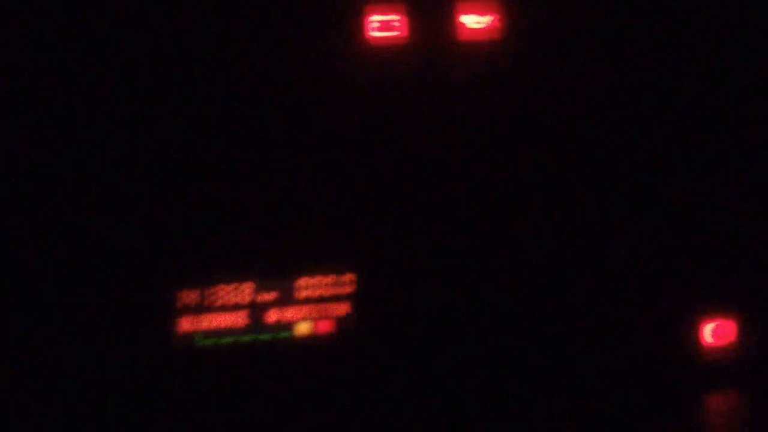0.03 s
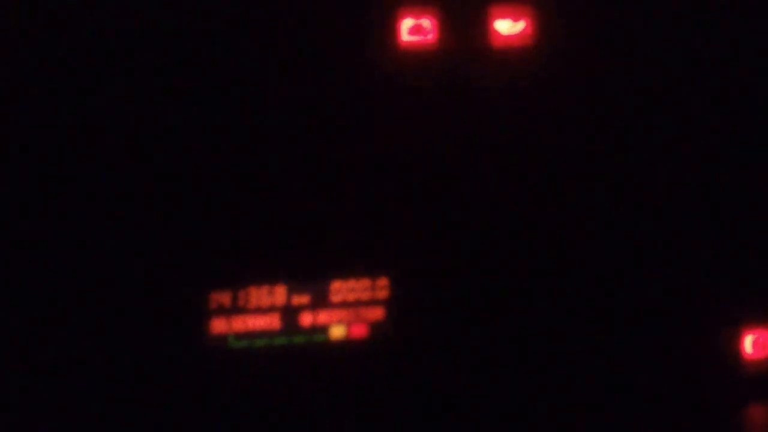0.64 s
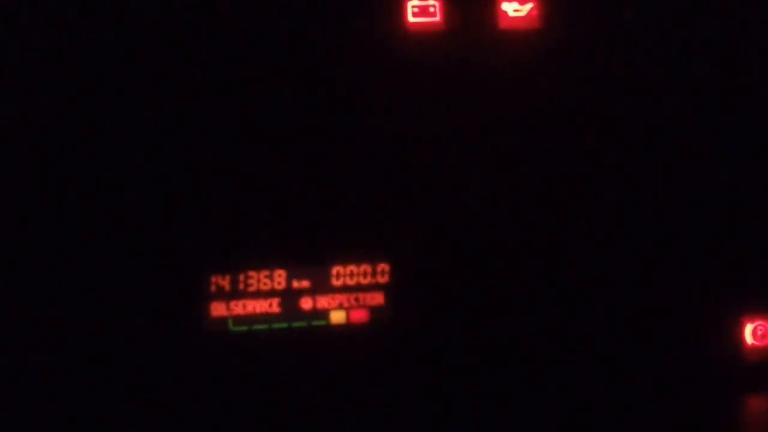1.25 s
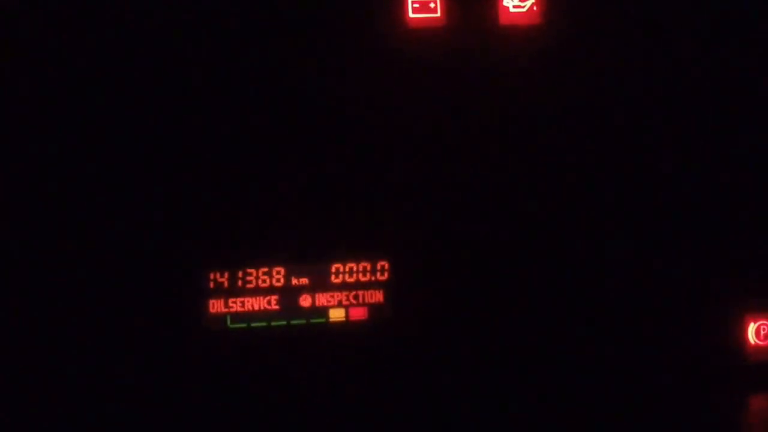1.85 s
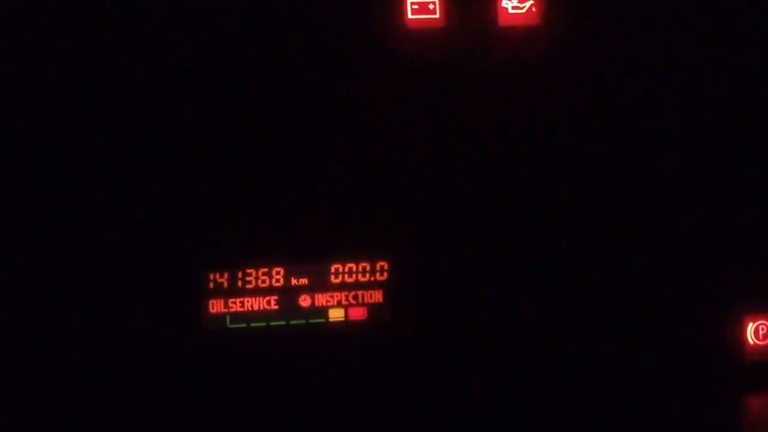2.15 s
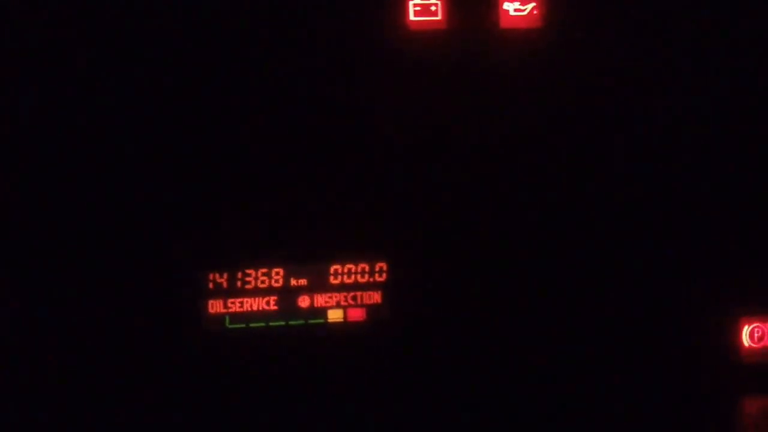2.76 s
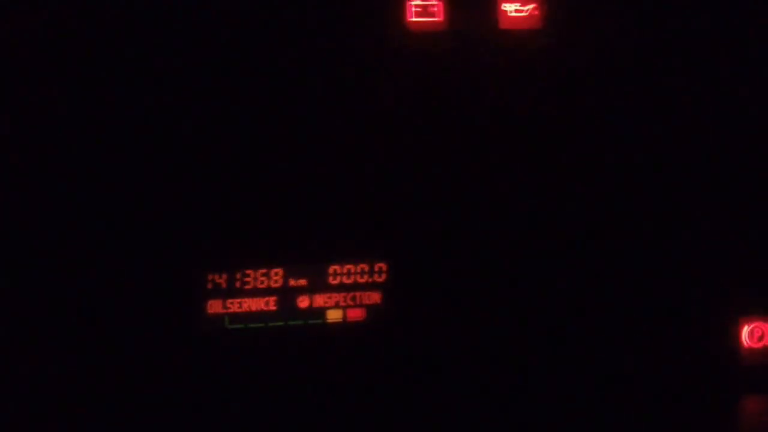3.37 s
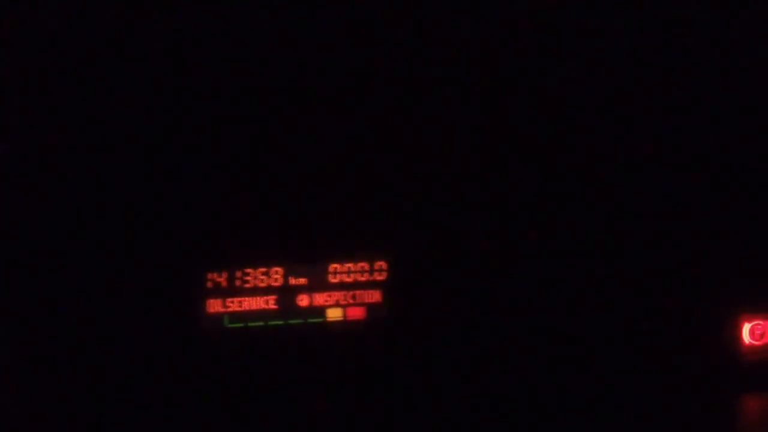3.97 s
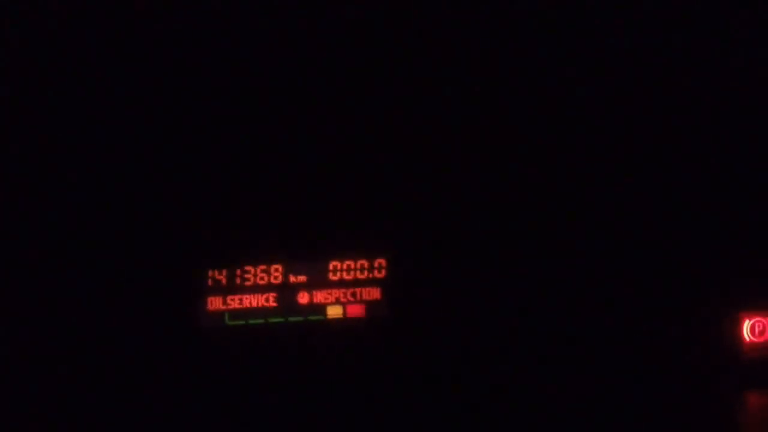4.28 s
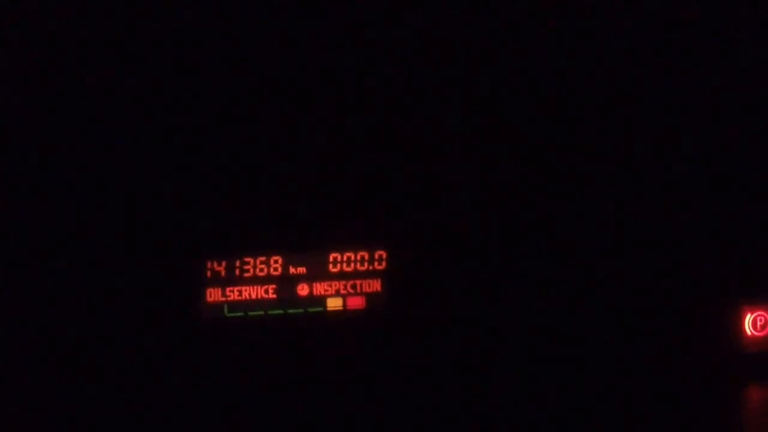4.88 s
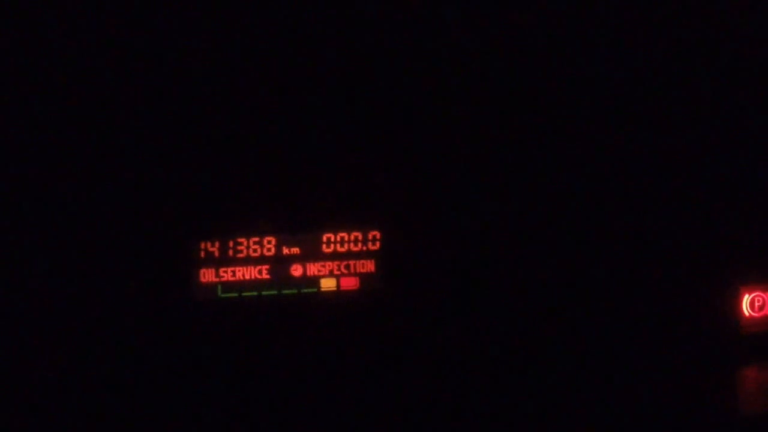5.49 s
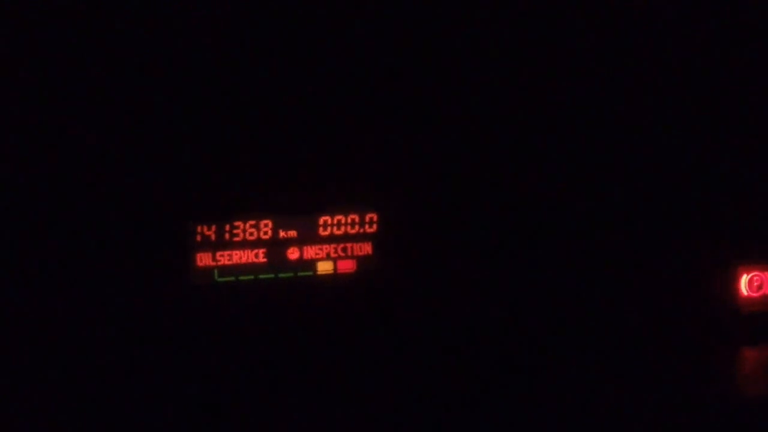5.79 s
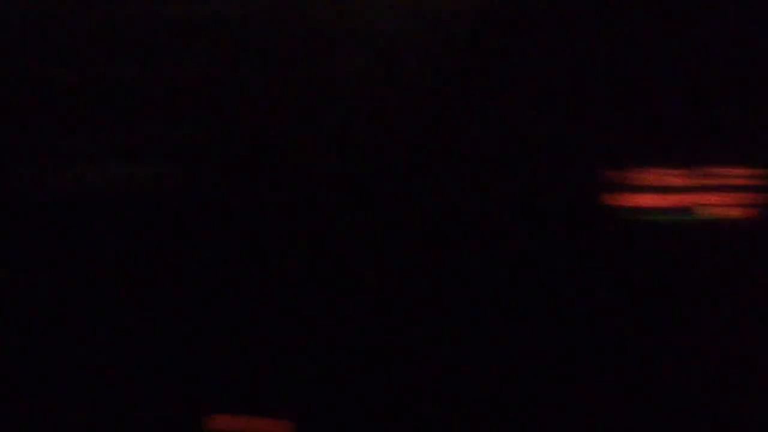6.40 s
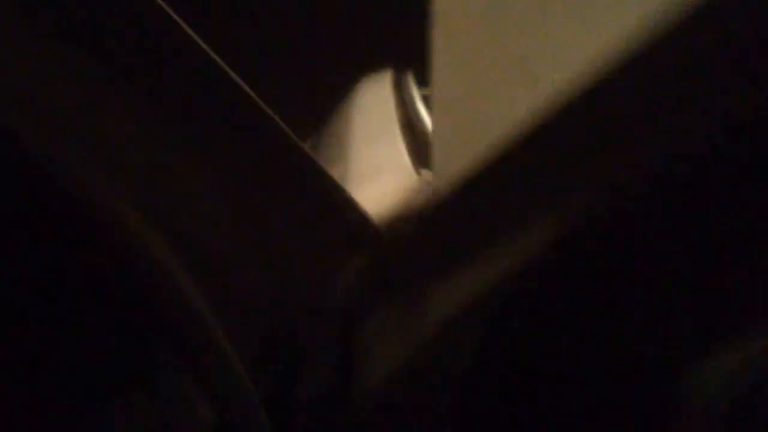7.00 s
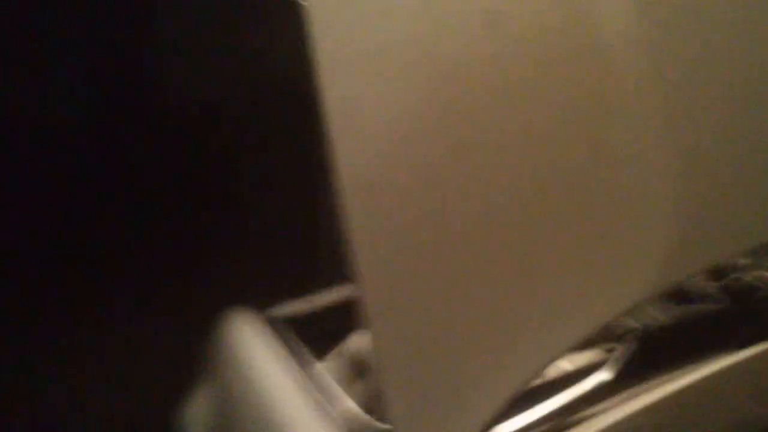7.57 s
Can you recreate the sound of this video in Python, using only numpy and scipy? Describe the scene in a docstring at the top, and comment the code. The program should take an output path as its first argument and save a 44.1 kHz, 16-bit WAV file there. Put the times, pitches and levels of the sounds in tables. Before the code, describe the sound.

Inside a car, keys tick, the starter cranks briefly, and the engine catches, flares and settles into a deep, booming idle.

```python
"""Inside a parked car at night, microphone at the driver's seat. At arm's length a sleeve rustles, keys tick,
the starter relay clicks and the starter whines briefly. Up front the six-cylinder engine catches with a shudder
and a thump, flares, and sinks to a fast idle that booms in the cabin. The fan hiss swells as the microphone
swings in close to the dashboard, where the plastic trim rattles."""
import sys
import numpy as np
from scipy import signal
from scipy.fft import rfft, irfft, next_fast_len
from scipy.io import wavfile
from scipy.ndimage import map_coordinates

SR = 44100
rng = np.random.default_rng(int(sys.argv[2]) if len(sys.argv) > 2 else 0)


def output_pcm(signal):
    """Save a mono or channel-first signal as 16-bit PCM at the path in sys.argv[1].

    Samples are clipped to [-1, 1] before scaling.
    """
    pcm = np.clip(np.atleast_2d(signal).T, -1, 1) * 32767
    wavfile.write(sys.argv[1], SR, np.round(pcm).astype(np.int16))


N = 341334

# The starter bites, the first cylinders fire, the shudder peaks, the engine runs by itself.
CRANK_S, CATCH_S, SHUDDER_S, RUN_S = 2.873, 3.44, 3.472, 3.55
CRANK_HZ, CATCH_HZ, IDLE_HZ, HIGH_HZ = 47.97, 42.06, 65.8, 77  # firings a second
DIP_S, DIP_END_S = 3.552, 3.578  # the level dips briefly after the thump
SWING_S = 6.17  # the microphone starts towards the dashboard


def engine():
    """Firings boom as a deep tone with overtones; unequal cylinders throb and body panels drone."""
    # Through the flare, then the sinking idle. Each row: time in seconds, firings a second.
    flare_speed = [(3.62, 81.7), (3.796, 84.8), (4.006, 78.7), (4.25, 67.2)]
    idle_speed = [(4.55, 65.3), (4.93, 65.3), (5.11, 63.1), (5.81, 60.4), (6.12, 59.9), (6.18, 58.9),
                  (7.3, 54.6), (7.69, 54.4)]
    # How the cabin booms at the seat. Each row: pitch in Hz, level in dB.
    cabin_boom = [(42, -22.5), (54, -19), (61, -18.4), (66, -24.5), (81, -30.5), (111, -41.5), (122, -45),
                  (135, -38.5), (157, -33), (168, -39.5)]
    # Upper engine orders. Each row: multiple of the firing rate, relative level in dB.
    upper_orders = [(2.5, 1.5), (3, .5), (4, -2.5), (5, -9), (6, 0), (7, -15), (8, -7.5), (9, -21)]
    # Orders of the unequal cylinders. Each row: multiple of the six-firing cycle, relative level in dB.
    uneven_orders = [(2, -9), (3, -3), (4, -29.5), (5, -1.5), (7, -54), (11, -14), (13, -15.5), (17, -16),
                     (19, -21), (22, -21), (29, -25)]
    # Panel resonances. Each row: frequency in Hz, half width in Hz, relative level in dB.
    panels = [(360, 28, -1), (485, 46, 3.5), (657, 29, -6), (958, 56, -6.5), (1370, 140, -8),
              (1750, 190, -14.5)]
    crank_speed = [(CRANK_S, CRANK_HZ), (CATCH_S - .14, CRANK_HZ), (CATCH_S, CATCH_HZ)]
    hz = curve(crank_speed + list(flare_speed) + list(idle_speed))
    firings = np.cumsum(hz * (1 + .002 * wobble(14))) / SR
    revs = np.clip((hz - IDLE_HZ) / (HIGH_HZ - IDLE_HZ), 0, 1)
    swing = ramp(SWING_S, .63)
    node = swell(6.65, .33)  # the microphone crosses a quiet spot of the boom
    close = ramp(SWING_S + .3, 1.0)  # and ends right at the dashboard
    # The engine rocks on the starter; each compression checks it.
    rocking = ramp(2.904, .23) * (1 - ramp(CATCH_S - .09, .045)) * amp(-10.5 - 14 * compression())
    shudder = amp(8.3) * envelope(SHUDDER_S, RUN_S, attack=.21, release=.031)
    force = rocking + shudder + ramp(RUN_S, .02)
    boom_db = along(cabin_boom, hz) - 5 * node
    octave_db = along(cabin_boom, np.maximum(2 * hz, 108)) + 1.8 * wobble(9)
    boom = amp(boom_db) * tone(firings)
    octave = amp(octave_db) * tone(2 * firings)
    frayed = firings + .006 * wobble(30)  # each firing comes slightly early or late
    body_db = -50 + 1.28 * (boom_db - along(cabin_boom, 60)) - 6 * close - 3 * revs
    dash_gain = close * amp(-54.5)  # the orders arrive through the body and from the dashboard
    overtones = sum((amp(body_db + db) + dash_gain) * amp(2.17 * wobble(7)) * tone(k * frayed)
                    for k, db in upper_orders)
    throb_db = -38 + 3 * revs - 13 * ramp(6.75, .59)
    throb = sum(amp(throb_db + db + 2 * wobble(6)) * tone(k * firings / 6) for k, db in uneven_orders)
    # No two burns are alike, which leaves a rumble between the orders until the idle settles.
    rumble_db = -37.5 - 12 * ramp(4.3, 1.4) + 7 * node
    rumble_spectrum = [(15, -7.5), (35, 5.5), (55, 7), (90, -6.5), (170, -10), (300, -28), (900, -83)]
    rumble = amp(rumble_db) * noise(rumble_spectrum)
    drone = amp(-63 + 16 * revs + 16 * swing) * resonant(panels)
    # The shudder is mostly the deep tone: the rest grows only a little with it.
    rest = np.minimum(force, 1.7) * (octave + overtones + throb + rumble + drone)
    return force * boom + rest + machinery(firings, revs, swing)


def machinery(firings, revs, swing):
    """Valves and gears clatter in time with the shaft; intake and fan air hiss evenly."""
    # Idle clatter, cranking grind and air hiss. Each row: frequency in Hz, spectral level in dB.
    clatter_spectrum = [(25, 14), (60, 7), (130, 3), (250, -1.5), (480, -2.5), (680, -6.5), (950, -6),
                        (1150, -9.5), (1450, -4.5), (1950, -9), (2600, -8.5), (3600, -20.5), (5000, -12.5),
                        (8000, -45.5), (11000, -94)]
    grind_spectrum = [(59, -42.5), (100, -1), (152, -6.5), (241, -0.5), (281, -2), (447, -13), (590, -7),
                      (855, -9), (1580, -9.5), (1970, -16.5), (2480, -10), (3120, -16), (4000, -19.5),
                      (5200, -46), (8800, -120)]
    hiss_spectrum = [(1000, -10), (3600, -6), (4300, -5), (4700, -3), (5600, 0.5), (6500, 1.5), (7200, -7),
                     (7800, -13.5), (8800, -24.5), (10000, -56), (11000, -68)]
    # The valve gear sings. Each row: frequency in Hz, half width in Hz, relative level in dB.
    valves = [(1417, 130, -0.5), (4570, 140, -4.5)]
    # Fan hiss at the microphone. Each row: time in seconds, relative level in dB.
    fan_levels = [(4.3, -47), (5.25, -49.5), (6.23, -48), (6.95, -40), (7.65, -38)]
    turning = envelope(CRANK_S, N / SR, attack=.045, release=1)
    running, load = ramp(CATCH_S, .15), compression()
    pulse = unit(np.exp(.12 * tone(firings / 2) + .08 * tone(firings) + .09 * tone(2 * firings)))
    idle_db = -44.5 + 4 * revs + 2.5 * swing
    idle = amp(idle_db) * (noise(clatter_spectrum) + amp(-14.5) * resonant(valves))
    grind = amp(-42.3 + 3.3 * load + 5 * ramp(3.29, .17)) * noise(grind_spectrum)
    gears = np.sqrt(running) * idle + np.sqrt(1 - running) * grind
    clatter = reflected(pulse * gears, wet_db=-7, t60=.086)
    throttle = swell(3.736, .2)  # opens briefly after the catch
    running_db = curve(fan_levels) + 1.28 + 5 * throttle
    cranking_db = -42 + 2 * load + 3.8 * ramp(3.01, .53)
    hiss_db = running * running_db + (1 - running) * cranking_db
    hiss = amp(hiss_db + .46 * wobble(15)) * reflected(noise(hiss_spectrum), wet_db=-12, t60=.11)
    return turning * (amp(.41 * wobble(12)) * clatter + hiss)


def thump():
    """The first strong burns jolt the body of the car: a low ring and a short rattle."""
    # Modes of the car body. Each row: frequency in Hz, level in dB, seconds to fall 60 dB.
    body_modes = [(104.3, -8, 0.16), (225, -28, .1), (319, -20, 0.086), (463, -13, .1)]
    # The rattle. Each row: frequency in Hz, spectral level in dB.
    rattle_spectrum = [(30, -11), (70, -9), (150, 3), (250, -3.5), (380, -14), (480, -3), (620, -19),
                       (1000, -17.5), (3500, -28), (6000, -20), (7200, -27), (8200, -43), (15500, -51)]
    ring = struck(np.maximum(clock() - 3.537, 0), body_modes)
    rattle = amp(-12.5) * envelope(3.539, DIP_S, attack=.031, release=.053) * noise(rattle_spectrum)
    return ring + rattle


def starter():
    """The pinion's whine sags on compressions and climbs as the engine frees; its housing rings."""
    # The pinion's whine. Each row: time in seconds, gear mesh rate in Hz.
    mesh_rates = [(2.86, 190), (2.915, 231.8), (2.985, 202.8), (3.055, 302.3), (3.16, 278.2),
                  (3.225, 325.4), (3.325, 352.3), (3.5, 340)]
    # How the engine mounts pass the whine on. Each row: frequency in Hz, level in dB.
    mounts = [(203, -35), (240, -46), (285, -33), (325, -38), (350, -46.5), (450, -50), (600, -38.5),
              (650, -48.5), (704, -35.5)]
    # Housing resonances. Each row: frequency in Hz, half width in Hz, relative level in dB.
    housing = [(516, 21, -4), (707, 7.4, -7), (937, 37, -1.5), (1026, 15, 3.5), (1223, 22, -3.5),
               (1330, 31, 1), (1556, 35, 1), (2210, 11, -2), (2530, 50, -15), (2640, 16, -0.5),
               (3490, 21, -6), (6100, 110, -14)]
    hz, load = curve(mesh_rates), compression()
    engaged = ramp(CRANK_S, .11) * (1 - ramp(CATCH_S - .03, .08))
    teeth = np.cumsum(hz * (1 + .011 * wobble(70))) / SR
    whine = sum(amp(along(mounts, k * hz) + 13 * (load - 1)) * tone(k * teeth) for k in (1, 2))
    load_db = -46 + 5.1 * load
    upper = sum(amp(load_db - 9.5 - 1.65 * k + 7.6 * wobble(18)) * tone(k * teeth) for k in range(3, 7))
    return engaged * (whine + upper + amp(load_db - 2) * resonant(housing))


def compression():
    """How hard the pistons push back on the starter, 0 to about 1."""
    # Compression strokes. Each row: peak time in seconds, half length in seconds, strength.
    strokes = [(2.957, 0.053, .6), (3.111, .055, 0.79), (3.231, .026, 1.08), (3.336, 0.026, 0.8)]
    return sum(strength * swell(s, width) for s, width, strength in strokes)


def plastic_snaps():
    """The starter relay clicks in and out, and later the trim: each snap cracks and briefly rings the hard
    plastic."""
    # Each row: start in seconds, relative level in dB, pitch factor.
    snaps = [(2.8282, -11.5, 1), (2.8291, -10, .98), (2.8294, -36.5, 1.2), (2.8382, -25, 1.05),
             (3.4363, -8, .97), (3.4389, -26.5, 1), (7.319, -16.5, 1.2), (7.327, -20.5, 1.4),
             (7.335, -21, 1.4), (7.337, -14.5, 1.25), (7.346, -18, .75)]
    # Each row: frequency in Hz, relative level in dB, seconds to fall 60 dB.
    plastic_modes = [(2380, -25, 0.033), (4630, -21, 0.017), (5070, 4.5, 0.011), (5400, 5, 0.016),
                     (5900, -5.5, .016), (6700, -12, 0.057), (7300, -22, 0.01)]
    # Each row: frequency in Hz, spectral level in dB.
    crack_spectrum = [(500, -42.5), (2300, -7.5), (3500, -16), (5200, 6.5), (7500, -4), (9500, -12),
                      (11000, -29.5), (15500, -26)]
    t = np.arange(SR // 8) / SR
    rings, cracks = np.zeros((2, N))
    for s, db, pitch in snaps:
        add(rings, s, amp(db - 10) * struck(t, plastic_modes, pitch) * (1 - np.exp(-t / .00024)))
        add(cracks, s, amp(db - 9.5) * burst(t, t60=.015, echo_db=-15, echo_t60=.072))
    return rings + coloured(cracks, crack_spectrum)


def keys():
    """Key and fingers tick and knock at the lock and dashboard; the hollow steering column rings."""
    # Each row: start in seconds, then relative levels in dB of tick, knock and hollow ring.
    touches = [(.569, -53, -62, -85), (.779, -47, -52, -78), (.796, -39, -66, -80), (.822, -48.5, -50, -70),
               (.878, -49, -49.5, -67), (.948, -38.5, -48, -53.5), (.962, -52, -47, -57),
               (1.125, -33.5, -54, -72), (1.178, -48, -60, -80), (1.213, -52, -45, -69),
               (1.226, -57, -45, -57), (1.406, -37.5, -47, -66), (1.431, -35, -64, -80),
               (1.462, -52, -61, -65), (1.594, -46, -64, -80), (1.603, -48, -48.5, -72),
               (1.935, -57, -70, -85), (2.535, -49, -72, -85), (2.736, -42, -67, -80),
               (7.325, -38, -25, -42)]
    # Key and column. Each row: frequency in Hz, relative level in dB, seconds to fall 60 dB.
    key_modes = [(2780, -20, 0.036), (3450, -19.5, 0.025), (6050, -16, 0.023)]
    column_modes = [(330, -7, 0.14), (726, -4, .08), (950, -2, 0.086)]
    # Bright tick and dull knock. Each row: frequency in Hz, spectral level in dB.
    tick_spectrum = [(400, -7), (2000, -2), (3500, -1.5), (6000, 8), (7200, 1.5), (8500, -15.5),
                     (15000, -22)]
    knock_spectrum = [(100, -0.5), (320, 4), (550, -14.5), (850, -3), (1300, -9), (2500, -3.5),
                      (4000, -19.5), (9000, -28.5)]
    t = np.arange(SR // 6) / SR
    ticks, knocks, rings = np.zeros((3, N))
    for s, tick_db, knock_db, hollow_db in touches:
        add(ticks, s, amp(tick_db - 8.5) * burst(t, t60=.03, echo_db=-25, echo_t60=.12))
        add(knocks, s, amp(knock_db - 8) * burst(t, t60=.047, echo_db=-16, echo_t60=.12))
        key = amp(tick_db) * ringing(t, key_modes, scatter_db=0)
        column = amp(hollow_db) * ringing(t, column_modes, scatter_db=3)
        add(rings, s, (key + column) * (1 - np.exp(-t / .0011)))
    return coloured(ticks, tick_spectrum) + coloured(knocks, knock_spectrum) + rings


def sleeve():
    """Cloth brushes along in soft, uneven strokes as the hand works the key."""
    # Each row: start in seconds, end in seconds, level in dB.
    brushes = [(0.405, .47, -62.5), (0.92, 1.11, -64.5), (1.313, 1.542, -64.5), (2.56, 2.638, -77),
               (2.72, 2.754, -67.5)]
    rustle = sum(amp(db) * envelope(start, end, attack=.47, release=.34) for start, end, db in brushes)
    cloth = noise([(200, -.5), (600, -9), (1800, -15), (3000, -6.5), (4200, -8), (6000, 2.5),
                   (7200, -7), (8500, -19), (15000, -32.5)])
    return rustle * amp(1.9 * wobble(45)) * cloth


def cabin():
    """Low cabin rumble and a thin steady hiss until the start; an electrical whine in the dashboard."""
    # The faint background floor. Each row: frequency in Hz, spectral level in dB.
    floor_spectrum = [(12, -23), (22, 4), (45, 1.5), (75, -8), (120, -17), (200, -17.5), (300, -21.5),
                      (560, -26), (1000, -27), (1700, -31), (2500, -33), (7000, -36), (15500, -40.5)]
    floor = (1 - ramp(CRANK_S, .4)) * amp(-58.5) * noise(floor_spectrum)
    whine_hz = curve([(2.8, 1700), (6.5, 1676)])
    whine_db = -84 + 6 * ramp(RUN_S, .8) + 22 * swell(7.1, .6)  # loudest as the microphone passes it
    return floor + amp(whine_db + 1.5 * wobble(4.6)) * tone(np.cumsum(whine_hz) / SR)


def reflected(x, wet_db, t60):
    """Glass and dashboard return many early copies, which ripple the spectrum."""
    t = np.arange(SR // 8) / SR
    tail = rng.standard_normal(len(t)) * amp(-60 * t / t60) * (t > .002)
    echoes = signal.fftconvolve(x, tail / np.linalg.norm(tail))[:N]
    return np.std(x) * unit(x + amp(wet_db) * echoes)


def burst(t, t60, echo_db, echo_t60):
    """A crack of noise and its short answer from the upholstered cabin."""
    return rng.standard_normal(len(t)) * (amp(-60 * t / t60) + amp(echo_db - 60 * t / echo_t60))


def struck(t, modes, pitch=1):
    """The (Hz, dB, t60) modes, ringing down from one clean blow."""
    return sum(amp(db - 60 * t / t60) * np.sin(2 * np.pi * pitch * hz * t) for hz, db, t60 in modes)


def ringing(t, modes, scatter_db):
    """The (Hz, dB, t60) modes, struck a little differently each time."""
    return sum(amp(db + scatter_db * rng.standard_normal() - 60 * t / t60) * tone(hz * t)
               for hz, db, t60 in modes)


def resonant(modes):
    """Noise of rms 1 that sings in the (Hz, half width, dB) resonances."""
    m = next_fast_len(N)
    f = np.fft.rfftfreq(m, 1 / SR)
    response = sum(amp(db) / (1 + ((f - hz) / width) ** 2) for hz, width, db in modes)
    return unit(irfft(rfft(rng.standard_normal(m)) * response, m)[:N])


def coloured(x, points):
    """x through a causal filter of unit power that follows the (Hz, dB) points."""
    m = 2 * next_fast_len(N // 2 + 8192)
    gain = unit(amp(along(points, np.fft.rfftfreq(m, 1 / SR) + 1)))
    cepstrum = irfft(np.log(gain + 1e-6))
    cepstrum[1:m // 2] *= 2  # folded to minimum phase, so nothing rings ahead of a hit
    cepstrum[m // 2 + 1:] = 0
    return irfft(rfft(x, m) * np.exp(rfft(cepstrum)))[:N]


def noise(points):
    """Noise of rms 1, coloured by the (Hz, dB) points."""
    return unit(coloured(rng.standard_normal(N), points))


def tone(turns):
    """A sine of rms 1 with a random start, from its count of turns."""
    return np.sqrt(2) * np.sin(2 * np.pi * (turns + rng.random()))


def wobble(rate):
    """A smooth random curve, rate knots a second."""
    grid = np.arange(0, N + 64, 64)
    smooth = map_coordinates(rng.standard_normal(int(N * rate / SR) + 4), [grid * rate / SR])
    return np.interp(np.arange(N), grid, smooth)


def envelope(start, end, attack, release):
    """Gain 1 from start to end; rises 60 dB in attack seconds before, falls 60 dB in release after."""
    t = clock()
    return amp(-60 * (np.maximum(start - t, 0) / attack + np.maximum(t - end, 0) / release))


def ramp(start, length):
    """Rises evenly from 0 to 1."""
    return np.clip((clock() - start) / length, 0, 1)


def swell(s, width):
    """A smooth rise to 1 at time s and back."""
    return np.exp(-((clock() - s) / width) ** 2)


def curve(points):
    """One value per sample from (seconds, value) points."""
    return np.interp(clock(), *np.transpose(points))


def along(points, hz):
    """Read (Hz, dB) points on a log axis."""
    f, db = np.transpose(points)
    return np.interp(np.log(hz), np.log(f), db)


def add(track, s, sound):
    """Mix a sound in at time s."""
    track[round(s * SR):][:len(sound)] += sound


def clock():
    """The time of each sample."""
    return np.arange(N) / SR


def amp(db):
    """Decibels to gain."""
    return 10 ** (np.asarray(db) / 20)


def unit(x):
    """Scale to rms 1."""
    return x / np.sqrt(np.mean(x ** 2) + 1e-20)


def scene():
    """Everything as heard from the driver's seat, in mono."""
    return (engine() + starter() + thump() + plastic_snaps() + keys() + sleeve() + cabin())[None]


def record(dry):
    """The microphone wakes with a soft pop, rounds off peaks, drops out once and cuts the top treble."""
    wake_s, ceiling, top_hz = .227, .85, 15850
    t = clock() - wake_s
    pop = amp(-38) * np.exp(-np.abs(t) / .1)
    live = (t >= 0) * (dry - pop)
    rounded = live / (1 + np.abs(live / ceiling) ** 6) ** (1 / 6)
    dip_db = -37 * ramp(DIP_S, .002) * np.exp(-np.maximum(clock() - DIP_END_S, 0) / .011)
    m = next_fast_len(N + SR // 2)
    passband = np.fft.rfftfreq(m, 1 / SR) < top_hz
    return irfft(rfft(rounded * amp(dip_db), m) * passband, m)[:, :N]


dry = scene()
out = record(dry)
output_pcm(out)
```